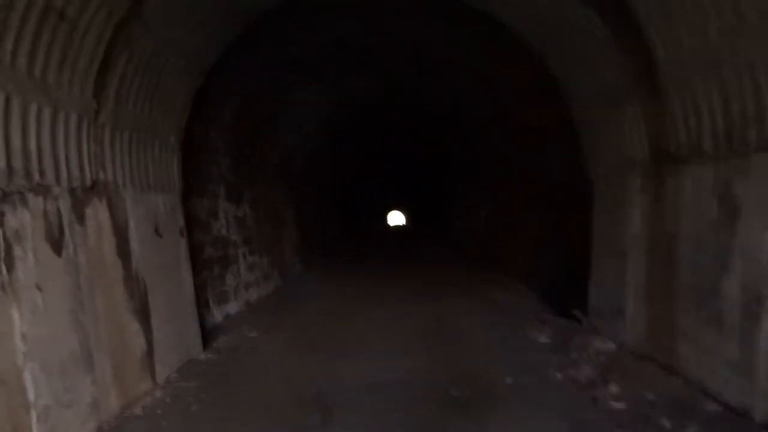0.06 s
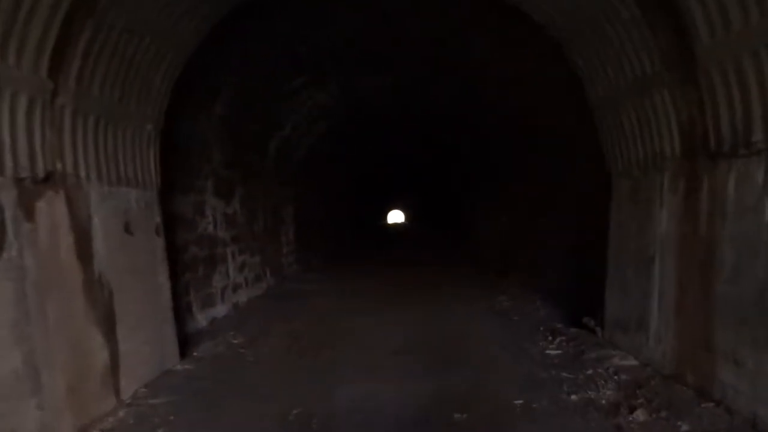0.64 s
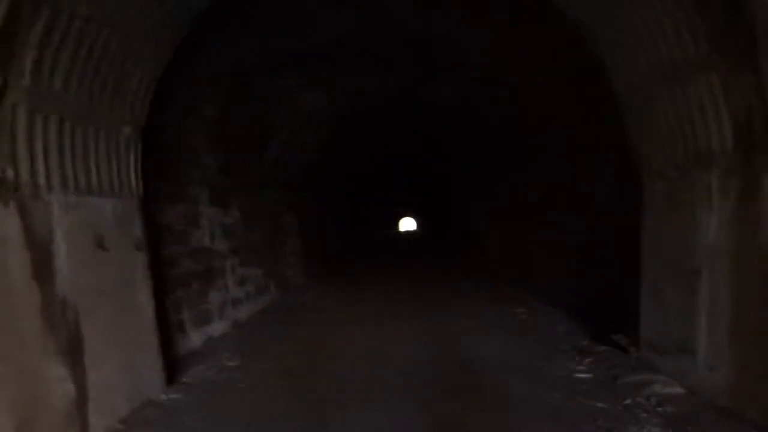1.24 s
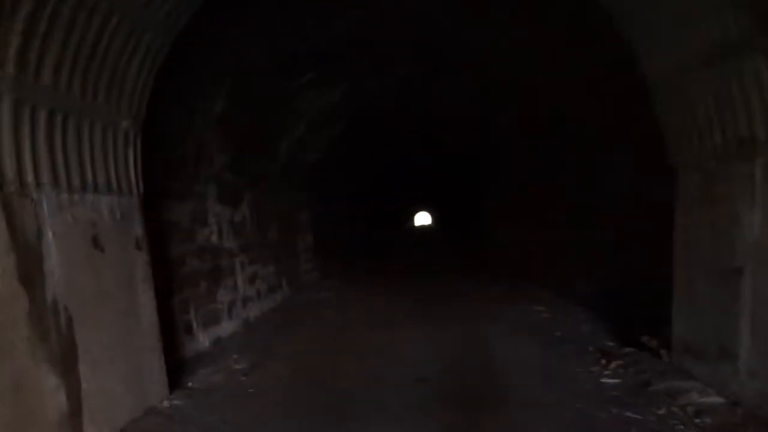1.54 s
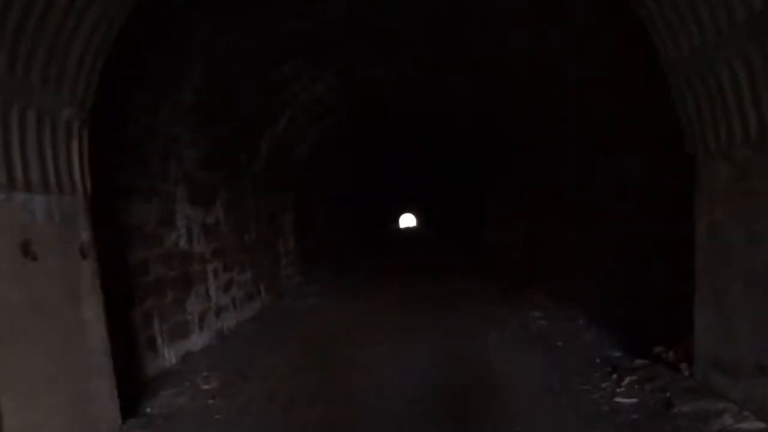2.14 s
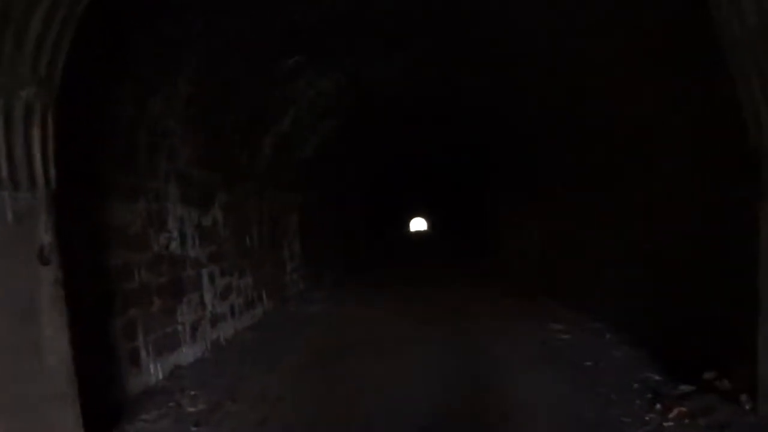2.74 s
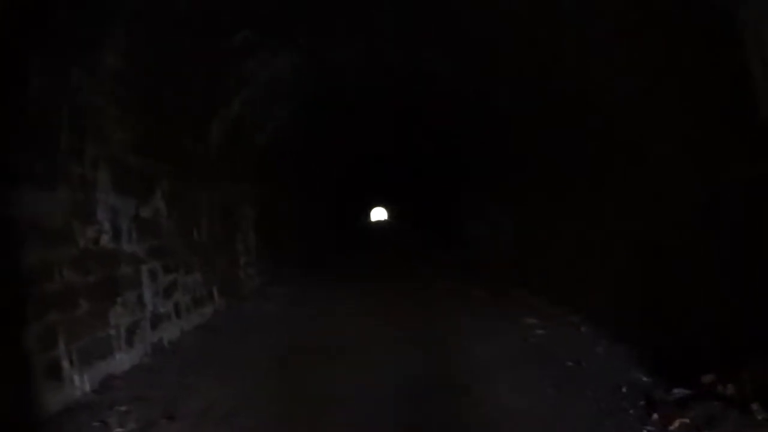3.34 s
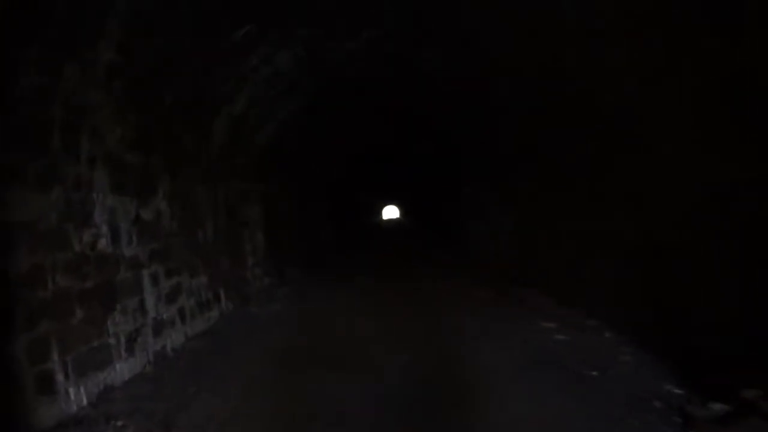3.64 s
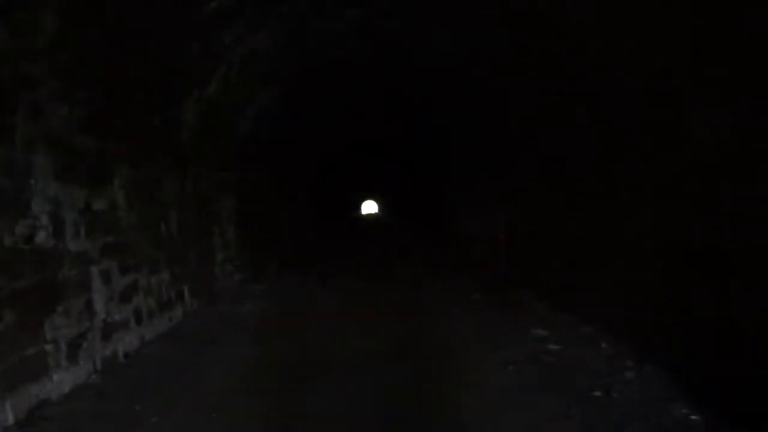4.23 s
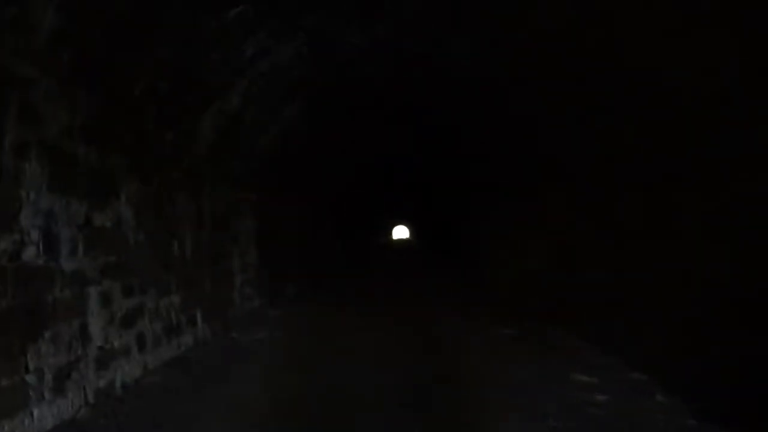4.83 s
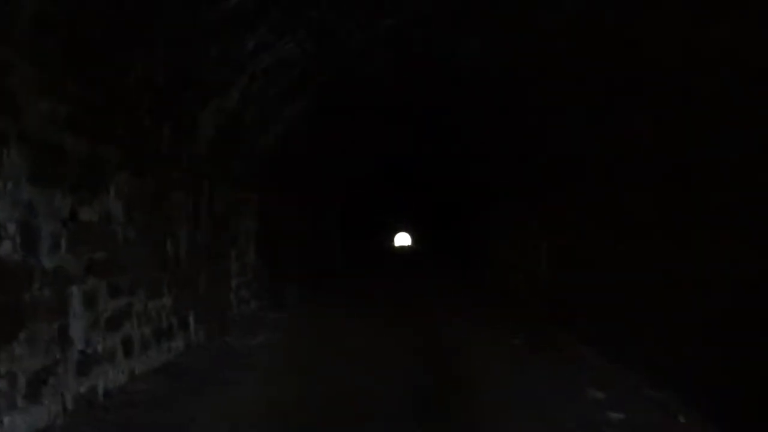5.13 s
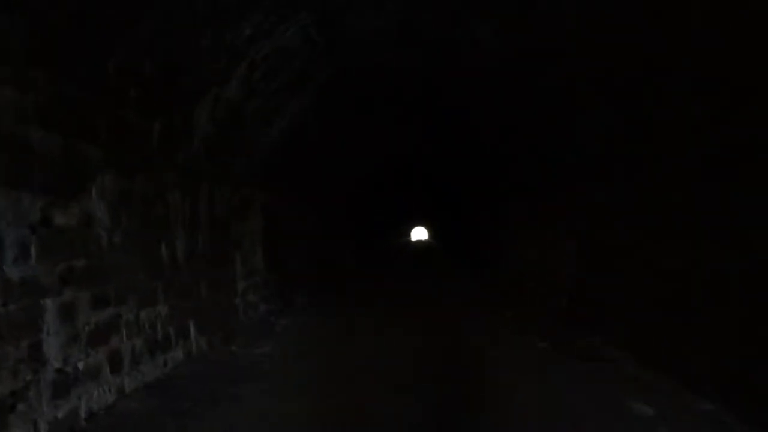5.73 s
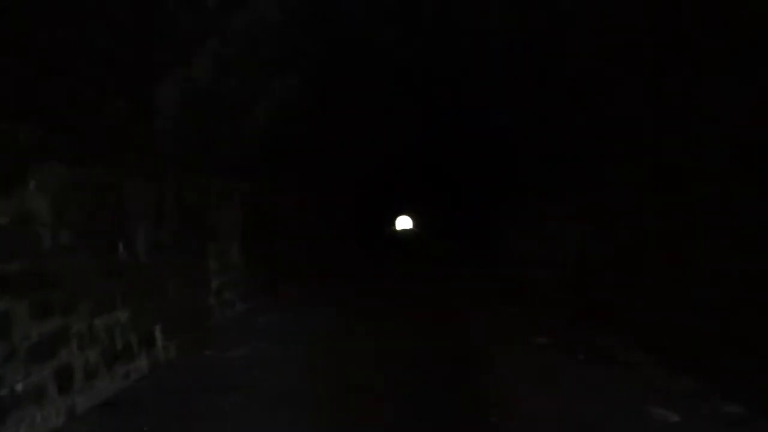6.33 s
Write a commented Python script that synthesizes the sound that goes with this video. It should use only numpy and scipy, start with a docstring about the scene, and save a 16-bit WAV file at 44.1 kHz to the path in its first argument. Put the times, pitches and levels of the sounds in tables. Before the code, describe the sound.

Steady footsteps crunch on gritty ground inside a long stone tunnel, with small stones clacking and a hollow echo after each step.

```python
"""In a long masonry tunnel, someone walks on hard, gritty ground at a little under two steps a second.
Heel, then sole load the grains, whose many brief fractures sum to a crunch; single stones clack as
heavily damped impacts. Reflection from walls and vault adds quick echoes and a hollow tail.
Behind the steps lie quiet air, a few thin whistles and the faint structure-borne rumble of a
hand-held camera as the grip shifts."""
import sys
import numpy as np
from scipy import signal
from scipy.fft import rfft, irfft, next_fast_len
from scipy.io import wavfile
from scipy.ndimage import uniform_filter1d

SR = 44100
rng = np.random.default_rng(int(sys.argv[2]) if len(sys.argv) > 2 else 0)


def store_wav(level_fs):
    """Save 16-bit WAV to argv[1]."""
    pcm = np.round(np.clip(np.atleast_2d(level_fs), -1, 1) * 32767)
    wavfile.write(sys.argv[1], SR, pcm.T.astype(np.int16))


N = 285768
TIME = np.arange(N) / SR
ENVELOPE_TIME = TIME[::64]

# spectrum of still air and microphone hiss: (frequency [Hz], level [dB])
AIR_SPECTRUM = [(20, -48), (60, -2.5), (150, -6.5), (400, 1), (900, -3), (1500, 0.5), (2500, -1),
                (4000, -15), (6000, -13), (10000, -20), (15500, -24.5)]
# faint whistles, perhaps a bird outside: (time [s], duration [s], level [dB], frequency [Hz])
WHISTLES = [(.8, .06, -57.5, 3170), (0.962, 0.042, -55.5, 3080), (2.132, .03, -54, 3100),
            (4.17, 0.057, -55.5, 2910)]
# the grip shifts on the camera: (time [s], duration [s], relative level [dB])
RUBS = [(0.268, 0.33, -58), (1.48, 0.19, -55.5), (2.104, 0.078, -50), (2.54, 0.39, -50.5),
        (2.98, 0.25, -55), (3.606, 0.09, -58.5), (3.984, .2, -45), (4.24, 0.44, -54), (4.822, 0.4, -54),
        (5.5, 0.094, -52.5), (5.85, 0.062, -57.5), (6.3, .18, -56)]
# the hand bumps the camera: (time [s], peak level [dB], frequency [Hz])
BUMPS = [(0.292, -40.5, 170), (0.356, -45, 199), (0.646, -39, 170), (1.496, -43.5, 174.5),
         (1.641, -43.5, 163), (2.117, -35.5, 170), (2.212, -36, 165), (2.548, -39, 175),
         (2.643, -33.5, 205), (2.725, -39, 170), (2.875, -36, 141), (3.046, -32, 129.5),
         (3.058, -31.5, 170), (4.036, -28, 167), (4.318, -33, 156), (5.704, -41.5, 182),
         (6.465, -38.5, 153)]
# spectrum of the handling noise: (frequency [Hz], level [dB])
HANDLING_SPECTRUM = [(20, -27), (50, -18), (80, -10), (120, -2.5), (165, -1.5), (220, -8), (300, -9),
                     (500, -24), (1000, -60)]
# first reflections from walls and vault: (mean delay [s], gain [ratio])
ECHOES = [(.0094, 0.18), (0.0099, 0.27), (0.0165, 0.23), (0.017, 0.16), (0.0269, 0.17), (0.03, 0.12),
          (0.036, 0.13), (0.043, 0.078), (0.0553, 0.079)]
# base reverberation time, scaled for near scatter and far tail: (frequency [Hz], decay time [s])
TUNNEL_T60 = [(200, 0.85), (600, 1.55), (1500, 1.04), (4000, 1.14), (9000, 0.92), (15000, 1.2)]
# stones clack or split under a shoe, a few followed by a strong slap off the tunnel wall:
# (time [s], level [dB], frequency [Hz], bandwidth [Hz])
CLACKS_AND_SLAPS = [(0.005, -13.5, 1450, 605), (.011, -21, 1405, 350), (0.0951, -19, 1330, 927),
                    (0.4011, -21, 1674, 885), (0.499, -18.5, 1270, 553), (0.5145, -15, 1700, 1150),
                    (0.563, -14.5, 1003, 670), (0.5847, -12.5, 1020, 523), (0.5942, -16.5, 1066, 696),
                    (0.642, -26.5, 7080, 3500), (0.6686, -16, 1435, 850), (0.8854, -24.5, 1935, 1380),
                    (1.0262, -22, 1268, 1310), (1.129, -18.5, 2047, 1433), (1.1405, -18.5, 1650, 626),
                    (1.409, -21.5, 1470, 624), (1.477, -24, 1720, 1220), (1.6223, -26, 1695, 760),
                    (1.6745, -20, 1370, 684), (1.855, -19.5, 1700, 965), (1.8704, -24.5, 2350, 1032),
                    (1.975, -16.5, 1700, 556), (1.986, -25, 1550, 350), (2.2147, -17, 1090, 758),
                    (2.2414, -19.5, 1680, 1070), (2.3016, -14.5, 1446, 850), (2.5569, -23, 1845, 1140),
                    (2.6175, -20.5, 2260, 1039), (2.7176, -17.5, 1730, 790), (2.7585, -16.5, 1250, 987),
                    (2.7949, -16.5, 1580, 740), (3.0208, -21, 1810, 1209), (3.0279, -20, 1850, 920),
                    (3.1915, -20.5, 1370, 1090), (3.202, -25.5, 2170, 1210), (3.3116, -17, 2170, 1807),
                    (3.3192, -18.5, 1100, 850), (3.3276, -15.5, 3180, 980), (3.5385, -31.5, 8900, 2970),
                    (3.848, -24.5, 1700, 1150), (4.0319, -24.5, 1280, 1015), (4.2917, -15.5, 1504, 850),
                    (4.3086, -23.5, 1400, 538), (4.332, -24.5, 1390, 398), (4.4629, -20.5, 1330, 850),
                    (4.5373, -21, 1397, 990), (4.553, -21.5, 1306, 915), (5.0541, -15.5, 1400, 785),
                    (5.112, -32.5, 9100, 945), (5.1151, -18, 1050, 838), (5.1184, -31.5, 8850, 950),
                    (5.415, -28, 1800, 1046), (5.6191, -26.5, 8300, 3014), (5.79, -22, 1600, 700),
                    (6.1363, -21.5, 1938, 1580), (6.18, -21.5, 1297, 460), (6.1933, -23.5, 7550, 3040),
                    (6.3307, -23, 1360, 698)]
# footfalls: (heel time [s], heel level [dB], heel rise [dB/s], roll on to the sole [s], sole level [dB],
# gravel offset [dB], grit offset [dB], sand offset [dB]); the levels are relative
STEPS = [(-.09, -43.5, 800, 0.091, -37.5, 4, -1.5, 1.5), (0.521, -39.5, 599, 0.065, -38.5, 4.5, -2, 1),
         (1.035, -39.5, 700, 0.11, -36, -0.5, -5.5, 2), (1.68, -44, 606, 0.072, -45.5, 1.5, -4, 4.5),
         (2.225, -41.5, 450, 0.036, -36, -14, -5, 0.5), (2.715, -43, 600, 0.071, -36.5, -4, -4, 2),
         (3.28, -45.5, 400, 0.048, -35, -1, -1.5, -2.5), (3.894, -44, 448, 0.053, -41.5, -1, -1, -1),
         (4.48, -40.5, 330, 0.035, -38.5, 2, -3, 6.5), (5.03, -41.5, 280, .045, -36.5, -1, -5.5, -2),
         (5.55, -38, 271, 0.075, -40, 2.5, -2.5, 0), (6.13, -46.5, 169.5, 0.046, -39.5, -1, -3, -1)]
# a shoe scuffs between steps: (time [s], duration [s], relative level [dB], grit offset [dB])
SCUFFS = [(.22, 0.22, -52, -11), (0.446, 0.027, -51, 0.5), (0.643, 0.023, -45.5, 2),
          (0.883, 0.028, -45.5, -7.5), (0.943, 0.059, -52, -4.5), (1.406, 0.11, -51, -9.5),
          (1.628, .03, -50.5, 0.5), (1.837, 0.023, -57, -4), (2.153, .04, -48, -7),
          (2.615, 0.12, -52.5, -2.5), (3.026, 0.018, -53.5, -0.5), (3.192, .04, -48.5, -8.5),
          (3.8, 0.095, -55, -4), (4.262, 0.034, -57.5, 4.5), (4.325, 0.16, -49, -7),
          (4.695, 0.033, -50, -7.5), (5.405, 0.033, -55.5, 2), (5.675, 0.032, -45.5, -2.5),
          (5.78, .04, -52.5, -8), (6.25, 0.095, -56, 4.5)]
# spectral weighting of the crunch: (frequency [Hz], gain [dB])
CRUNCH_SPECTRUM = [(120, -32), (300, -17.5), (450, -6.5), (700, 1), (1000, 2.5), (1450, 5.5), (2200, 2),
                   (3000, 2.5), (4200, -1), (5500, -6.5), (8000, -10.5), (11000, -17.5), (15500, -25)]
# how much diffuse sound differs between the microphone ports: (frequency [Hz], side gain [dB])
DIFFUSE_WIDTH = [(100, -32), (300, -10.5), (700, -8.5), (1400, -12), (3000, -12.5), (5000, -12.5),
                 (8000, -14.5), (13000, -12.5)]
# the two microphone ports: (frequency [Hz], left minus right level [dB], left phase lead [rad])
PORTS = [(20.03, -4, -0.25), (90, 1, -0.71), (170, -0.5, -1.4), (278, 0, -1.1), (376, -1, -0.47),
         (850, -1.5, -0.25), (1700, 0, -0.26), (2440, 2, -0.37), (4300, 1.5, -0.32), (5800, 0, -0.41),
         (8500, 0, 0.065), (15000, 0.5, .05)]


def undb(db):
    """Amplitude ratio: a factor of ten for every 20 dB."""
    return 10 ** (np.asarray(db) / 20)


def power(db):
    """Power goes as amplitude squared; the powers of incoherent sounds add."""
    return undb(db) ** 2


def amplitude(envelope_power):
    """Amplitude is the root of power, here interpolated to every sample."""
    return np.interp(TIME, ENVELOPE_TIME, np.sqrt(envelope_power))


def unit(x):
    """Normalisation to an rms of 1."""
    return x / np.sqrt(np.mean(x ** 2))


def at_hz(table, hz, column=1):
    """Interpolation of a table column on a logarithmic frequency axis."""
    rows = np.array(table)
    return np.interp(np.log(hz + 1), np.log(rows[:, 0]), rows[:, column])


def shape(x, response):
    """Linear filtering: the spectrum is multiplied by a frequency response."""
    size = next_fast_len(x.shape[-1] + SR // 10)
    hz = np.arange(size // 2 + 1) * SR / size
    return irfft(rfft(x, size) * response(hz), size)[..., :x.shape[-1]]


def colour(x, spectrum):
    """Spectral weighting by a table of decibels."""
    return shape(x, lambda f: undb(at_hz(spectrum, f)))


def noise(spectrum):
    """Filtered Gaussian noise of rms 1."""
    return unit(colour(rng.standard_normal(N), spectrum))


def wander(rate_hz):
    """Slow random modulation of rms 1: straight lines between random values."""
    hold = int(SR / rate_hz)
    levels = np.repeat(rng.standard_normal(N // hold + 1), hold)
    return unit(uniform_filter1d(levels, hold)[:N])


def swell(s, hold_s, rise_db_s, fall_db_s):
    """Exponential growth and decay, linear in dB: reaches 0 dB at time s, holds and fades."""
    age = ENVELOPE_TIME - s
    return np.minimum(age, 0) * rise_db_s - np.maximum(age - hold_s, 0) * fall_db_s


def add(out, s, sound):
    """Superposition of a sound on the track, centred on time s."""
    where = int(s * SR) - len(sound) // 2 + np.arange(len(sound))
    inside = (where >= 0) & (where < N)
    out[where[inside]] += sound[inside]


def knock(hz, width_hz):
    """A heavily damped impact as a Gaussian tone pulse: the shorter it is, the wider its band."""
    t = np.arange(-SR // 20, SR // 20) / SR
    return np.exp(-2 * np.pi * (t * width_hz) ** 2) * np.cos(2 * np.pi * (hz * t + rng.random()))


def impulses(per_s, spread_db):
    """A Poisson process of rms 1: independent impulses, many small and a few large."""
    size = undb(spread_db * np.minimum(rng.exponential(size=N), 4))
    occurs = rng.random(N) < per_s / SR
    return unit(occurs * size * rng.choice([-1, 1], N))


def air(level_db=-54, drift_db=0.6):
    """The noise floor of air and hiss: uncorrelated mid and side under one drifting level."""
    level = undb(level_db + drift_db * wander(2.26))
    return level * noise(AIR_SPECTRUM), level * noise(AIR_SPECTRUM)


def whistles(waver=0.0084):
    """Short, far-off pure tones; slight frequency modulation makes them waver."""
    out = np.zeros(N)
    clock = np.cumsum(1 + waver * wander(120)) / SR
    for s, length_s, db, hz in WHISTLES:
        level = amplitude(power(db + swell(s, length_s, rise_db_s=600, fall_db_s=220)))
        out += level * np.sqrt(2) * np.sin(2 * np.pi * hz * clock)
    return out


def grip(resting_db=-66):
    """Envelope of the hand's friction: a resting hold and short shifts add in power."""
    shifts = sum(power(db + swell(s, length_s, rise_db_s=260, fall_db_s=176))
                 for s, length_s, db in RUBS)
    return amplitude(power(resting_db) + shifts)


def handling(flutter_db=4.0, slip_db=-3, rub_db=-5):
    """Structure-borne sound: slips, rubbing and bumps reach the microphone through the camera body."""
    slips = unit(colour(impulses(per_s=90, spread_db=0.5), HANDLING_SPECTRUM))
    rub = noise(HANDLING_SPECTRUM) * undb(flutter_db * wander(28))
    out = (undb(slip_db) * slips + undb(rub_db) * rub) * grip()
    for s, db, hz in BUMPS:
        add(out, s, undb(db) * knock(hz, width_hz=75))
    return out


def diffuse_decay(t, stretch, onset_s):
    """A diffuse field builds up, then decays exponentially at each band's own rate."""
    t60 = np.array(TUNNEL_T60)[:, 1:] * stretch
    build_up = np.clip(t / onset_s - 1, 0, 1)
    return np.exp(-np.log(1000) * t / t60) * build_up / np.sqrt(stretch * SR)


def tunnel(source, near_db=6.0, far_db=7.5, delay_spread=0.02, spots=7):
    """Reverberation by convolution, mid and side: first echoes, near scatter, a tail down the bore."""
    t = np.arange(1.4 * SR) / SR
    white = rng.standard_normal(len(t))
    centres = np.array(TUNNEL_T60)[:, 0]
    bands = np.array([shape(white, lambda f: at_hz(np.c_[centres, weights], f))
                      for weights in np.eye(len(centres))])
    near = undb(near_db) * diffuse_decay(t, stretch=0.43, onset_s=0.0068)
    far = undb(far_db) * diffuse_decay(t, stretch=0.85, onset_s=0.019)
    decay = np.hypot(near, far)
    # the contact moves under the sole, and every spot has its own pattern of reflections
    active_spot = np.arange(N) // (SR // 50) % spots
    out = np.zeros((2, N))
    for spot in range(spots):
        mid = np.sum(decay * np.roll(bands, rng.integers(len(t)), axis=1), axis=0)
        side = np.sum(decay * np.roll(bands, rng.integers(len(t)), axis=1), axis=0)
        for delay_s, gain in ECHOES:
            lag = int(delay_s * SR * (1 + delay_spread * rng.standard_normal()))
            mid[lag] += gain
            side[lag] += gain * rng.choice([-1, 1])
        share = uniform_filter1d(1. * (active_spot == spot), size=128)
        out += signal.fftconvolve([source * share], [mid, side], axes=1)[:, :N]
    return out


def pressure(fine, coarse, sandy, stance_db=-64, push_db=-17, push_delay_s=0.13):
    """Loading of one grain size: standing, steps (heel, sole, push-off) and scuffs add in power."""
    linger = 1.3 ** fine  # fine grit goes on cracking longer
    light_db = -9 * fine  # a light load cracks less of it
    total = power(stance_db + light_db)
    for s, heel_db, bite_db_s, roll_s, sole_db, gravel_db, grit_db, sand_db in STEPS:
        ground_db = coarse * gravel_db + fine * grit_db + sandy * sand_db
        heel = heel_db + swell(s, 0, rise_db_s=bite_db_s, fall_db_s=74)
        sole = sole_db + swell(s + roll_s, 0, rise_db_s=306, fall_db_s=143 / linger)
        push_swell = swell(s + roll_s + push_delay_s, 0, rise_db_s=306, fall_db_s=97)
        push = sole_db + push_db + light_db + push_swell  # the other foot pushes off
        total = total + power(ground_db + np.max([heel, sole, push], axis=0))
    for s, length_s, db, grit_db in SCUFFS:
        total = total + power(db + fine * grit_db + swell(s, length_s, rise_db_s=700, fall_db_s=298))
    return amplitude(total)


def pebbles(candidates=400, max_per_s=48, centre_hz=1510, spread_octaves=0.3):
    """Random impacts of small pebbles turning over: rate and level grow with the shoe's load."""
    load = pressure(fine=0, coarse=0, sandy=0)
    max_chance = max_per_s * N / SR / candidates
    chances, traits = rng.random((candidates, 2)), rng.standard_normal((candidates, 2))
    out = np.zeros(N)
    for (when, luck), (size, pitch) in zip(chances, traits):
        load_now = load[int(when * N)]
        if luck < max_chance * np.sqrt(load_now / load.max()):
            peak = undb(-13 + 2 * size) * load_now ** 0.42
            hz = centre_hz * 2 ** (spread_octaves * pitch)
            add(out, when * N / SR, peak * knock(hz, width_hz=600))
    return out


def stones_and_slaps(snap_db=-17, overtone_db=-8):
    """Stone impacts and a few strong wall reflections: shorter pulses have more overtone and snap."""
    clacks, snaps = np.zeros(N), np.zeros(N)
    for s, db, hz, width_hz in CLACKS_AND_SLAPS:
        hardness = min(width_hz / 1100, 1.1) ** 3
        add(clacks, s, undb(db) * knock(hz, width_hz))
        overtone = knock(hz + 1.33 * width_hz, 1.34 * width_hz)
        add(clacks, s, undb(db + overtone_db) * hardness * overtone)
        snap = rng.standard_normal(64) * np.hanning(64)
        add(snaps, s, undb(db + snap_db) * hardness * snap)
    return clacks + colour(snaps, CRUNCH_SPECTRUM)


def crunch(level_db=9.5, patchy_db=2, width_octaves=0.98):
    """Brittle fracture of six grain sizes: smaller grains sound higher and crack more often."""
    spurts_db = 1.94 * wander(110)  # the ground gives way in little spurts
    out = np.zeros(N)
    for hz in 375 * 2 ** np.arange(6):
        # how far this size counts as grit, gravel or sand
        fine, coarse, sandy = np.clip(np.log2([hz / 1700, 1400 / hz, hz / 4500]), 0, 1)
        cracks = impulses(per_s=1600 * (hz / 1500) ** .3, spread_db=3.0 + 1.2 * fine)
        cracks *= undb(spurts_db + patchy_db * wander(70))
        cracks *= pressure(fine, coarse, sandy)
        out += shape(cracks, lambda f: np.exp(-(np.log2((f + 1) / hz) / width_octaves) ** 2))
    return undb(level_db) * colour(out, CRUNCH_SPECTRUM)


def scene(stone_echo_db=0.5):
    """Superposition of direct sound, reflections and background; mid and side give left and right."""
    grit = crunch()
    clacks = stones_and_slaps() + pebbles()
    echo_mid, echo_side = tunnel(grit + undb(stone_echo_db) * clacks)
    air_mid, air_side = air()
    mid = grit + clacks + echo_mid + air_mid + handling() + whistles()
    side = colour(echo_side + air_side, DIFFUSE_WIDTH)
    return np.array([mid + side, mid - side])


def record(dry, cutoff_hz=15800):
    """Level and phase differences, split between two microphone ports, then a steep low-pass."""
    ports = []
    for channel, share in zip(dry, (.5, -.5)):
        def response(f):
            return undb(share * at_hz(PORTS, f)) * np.exp(1j * share * at_hz(PORTS, f, column=2))
        ports.append(shape(channel, response))
    low_pass = signal.ellip(12, .1, 90, cutoff_hz, fs=SR, output="sos")
    return signal.sosfilt(low_pass, ports)


dry = scene()
out = record(dry)
store_wav(out)
```